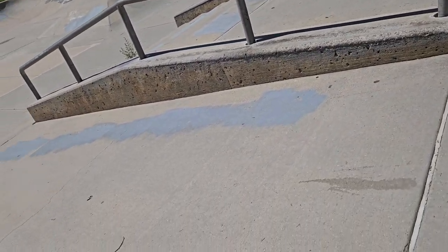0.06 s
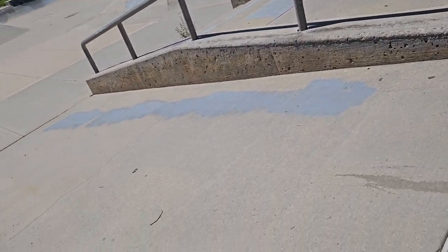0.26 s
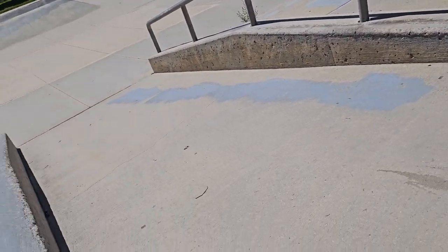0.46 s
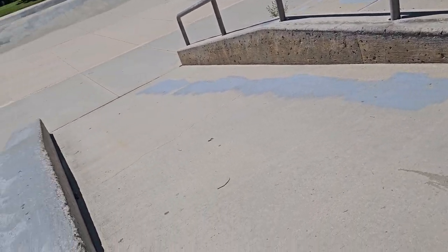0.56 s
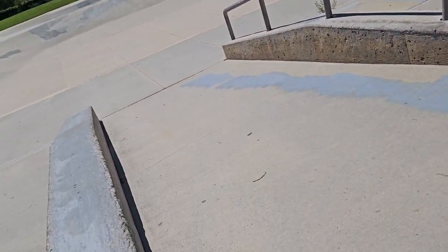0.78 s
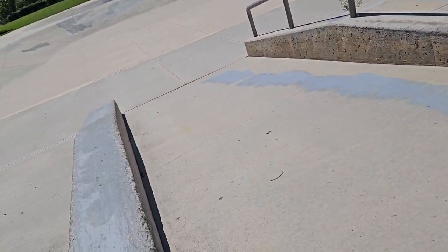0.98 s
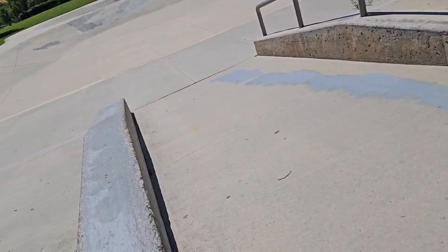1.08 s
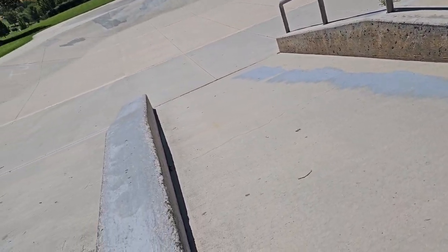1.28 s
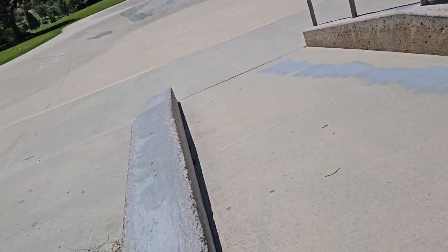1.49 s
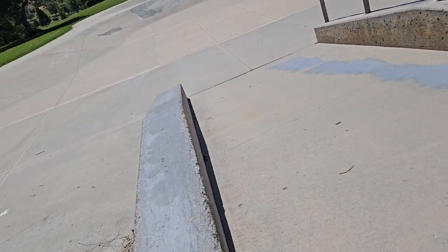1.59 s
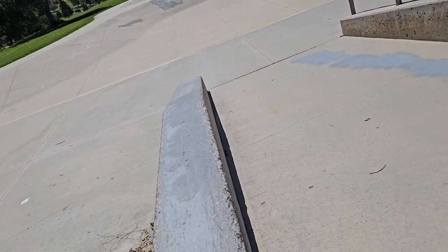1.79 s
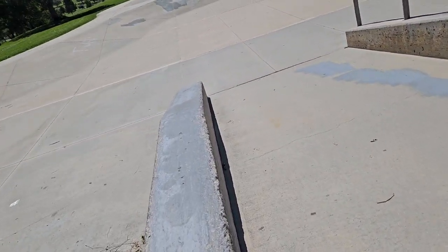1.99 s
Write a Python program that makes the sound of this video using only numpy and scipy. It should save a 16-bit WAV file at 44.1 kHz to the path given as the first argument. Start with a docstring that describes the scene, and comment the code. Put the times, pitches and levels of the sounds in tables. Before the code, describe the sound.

A skateboard is heard close on outdoor concrete, starting with a brief fading scrape. From 0.25 to 0.9 seconds it clacks down and knocks over joints, the wooden deck booming, axles rattling and wheels rumbling grittily. After a lull with faint taps, two more knocks come near 1.6 seconds, then small taps and a dull scuff at 1.9. Light wind on the microphone and a low hum continue throughout.

```python
"""A skateboard on the concrete of an open skatepark, heard up close.
Light wind rumbles on the microphone throughout, over a low hum. A scrape dies away at the start, and
grit makes the rolling wheels rumble and hiss. From 0.25 s the board clacks down and knocks over joints
in the slab: its wooden deck booms, and its trucks (the metal axles) rattle and ring. After a lull,
two more knocks come near 1.6 s, and the board settles with small taps and a dull scuff."""
import sys
import numpy as np
from scipy import signal
from scipy.fft import rfft, irfft
from scipy.io import wavfile

SR = 44100
rng = np.random.default_rng(int(sys.argv[2]) if len(sys.argv) > 2 else 0)


def generate_wav(sig):
    """Save sig (samples, or channels by samples) to the path in sys.argv[1] as 16-bit PCM at SR."""
    pcm = np.round(np.clip(np.atleast_2d(sig).T, -1, 1) * 32767).astype(np.int16)
    wavfile.write(sys.argv[1], SR, pcm)


N = 90404
TIME = np.arange(N) / SR
HIT_TIME = np.arange(SR // 3) / SR  # the clock for one short sound

# Strength of the wind: time_s, level_db
WIND_GUSTS = [(0, -41), (.14, -34.5), (.3, -48.5), (1.2, -46.5), (1.3, -40.5), (1.5, -45.5), (2.05, -44.5)]
# Tone of the wind, the open air, the opening scrape and the wheel hiss: pitch_hz, gain_db
WIND_TONE = [(25, -4.5), (52, 2), (100, -1), (145, -4), (190, -14), (330, -24.5), (1000, -70)]
AIR_TONE = [(700, -4), (1200, -13), (4800, -19), (7500, -23), (9500, -39)]
SCRAPE_TONE = [(200, -5), (340, 15), (600, 9.5), (700, -10.5), (1060, 9), (1550, -14), (1850, 12),
               (2500, -0.5), (4600, -9), (7000, -8), (9800, -39.5), (12800, -25.5)]
HISS_TONE = [(600, -20.5), (1800, 8), (2500, -4), (6300, -2), (8600, -9), (9900, -17.5), (12000, -13),
             (15500, -9)]
# Loudness of the rolling wheels: time_s, rumble_db, hiss_db
WHEEL_LEVELS = [(0, -30, -75), (.12, -46, -59), (.22, -36.5, -48), (.31, -27, -45), (.37, -37, -56),
                (.44, -23, -41), (.5, -33.5, -53), (.63, -43.5, -63), (.72, -39.5, -58.5),
                (.78, -41, -67.5), (.85, -43.5, -54.5), (1.01, -65, -76), (1.09, -43.5, -71),
                (1.17, -52, -74), (1.22, -73.5, -90.5), (1.59, -57, -70), (1.63, -41.5, -58),
                (1.72, -38.5, -62), (1.77, -84, -92.5), (2.05, -71, -71)]
# Pitches at which the whole board and the trucks ring when shaken: pitch_hz, width_hz, gain_db
BOARD_RESONANCES = [(295.8, 129, 0), (521.5, 59, 5), (598, 110, -7.5), (760, 61, -0.5), (1106, 120, -10),
                    (1258, 300, -7.5), (1586, 110, -12.5), (2150, 300, -21.5)]
TRUCK_RESONANCES = [(2150, 160, 0), (3580, 80, 10), (4050, 70, 2)]
# Hard knocks (a fade is the time a sound takes to drop by 60 dB):
# start_s, boom_db, boom_hz, boom_fade_s, clack_db, clack_hz, clatter_db, crack_db, clatter_fade_s
HARD_KNOCKS = [(0.2457, 7, 299, 0.017, -14, 527, -17, -16, 0.041),
               (0.2872, 2.5, 310, 0.036, -21, 531, -13.5, -27.5, 0.11),
               (0.3833, -10, 322.4, 0.35, -11, 568, -8.5, -27.5, 0.061),
               (0.398, -5.5, 289, 0.15, -2.5, 651, -13.5, -30.5, 0.12),
               (0.6583, -3.5, 289.5, 0.081, -2.5, 670, -23.5, -36.5, 0.21),
               (0.8046, -7, 302, 0.085, -7, 683, -22.5, -38.5, 0.23),
               (.8820, 0, 278, 0.02, -5, 673, -16, -36, 0.065),
               (1.5382, -11, 287.5, 0.048, -2, 626.6, -15.5, -31.5, 0.064),
               (1.6030, -9.5, 304.3, 0.066, -12.5, 656, -22, -35.5, 0.083)]
# Small taps and rattles: start_s, boom_db, clack_db, clack_hz, clatter_db, crack_db, fade_s
SMALL_TAPS = [(0.2515, -43, -8.5, 1112, -14.5, -54, 0.01), (.2950, -31.5, -7.5, 1000, -52, -46, 0.025),
              (0.2999, -39, -14.5, 1102, -29, -53, .04), (.436, -47, -31, 996, -22, -53, 0.12),
              (.4610, -42, -24, 539, -31, -48, 0.2), (.487, -31.5, -22, 594, -37.5, -53, 0.12),
              (.702, -22, -20, 674, -35.5, -51, 0.05), (.733, -29.5, -25, 548, -32, -54, 0.051),
              (0.8921, -8.5, -19.5, 745, -33, -38, 0.025), (1.042, -47.5, -30.5, 600, -48, -52, 0.041),
              (1.050, -39.5, -21.5, 622, -38, -50.5, 0.13), (1.112, -70, -28, 714, -42, -51.5, 0.06),
              (1.182, -59, -42, 708, -52, -58.5, 0.057), (1.559, -41, -23.5, 690, -29, -39.5, 0.036),
              (1.653, -28, -19.5, 570, -32.5, -52, 0.21), (1.715, -36, -28, 660, -41, -49.5, 0.016),
              (1.887, -36.5, -37.5, 532, -40, -61, 0.037)]
# Higher notes of the deck, with levels relative to its boom: pitch_hz, level_db, longest_fade_s
DECK_OVERTONES = [(506, -15.5, 0.21), (624.5, -21.5, 0.3), (752, -14, 0.22), (903, -26.5, 0.3),
                  (1070.5, -25, 0.065), (1300.3, -19.5, 0.076), (1631, -42.5, 0.24)]
# Tone of the sharp crack in each hit: pitch_hz, gain_db
CRACK_TONE = [(500, -21), (1500, 10), (2100, 6), (4800, -7.5), (6300, -7), (8400, -13.5), (9800, -22),
              (12000, -12.5), (15000, -10.5), (16500, -18)]
# How late the hits reach the left channel as the board moves: time_s, delay_ms
LEFT_DELAYS = [(.35, 0.2524), (.9, .1)]
# Fine ticks of grit and hardware: start_s, level_db
GRIT_TICKS = [(0.2592, -24), (0.635, -51.5)]
# Tone of those ticks: pitch_hz, gain_db
TICK_TONE = [(4800, -9.5), (6300, 11), (8000, -4), (9800, -13.5), (13000, -10.5)]
# Thin metal rings of a truck: start_s, level_db
TRUCK_PINGS = [(.291, -28), (.3838, -31), (.433, -42), (1.5385, -36)]
# Tone of the dull scuff: pitch_hz, gain_db
SCUFF_TONE = [(120, 2), (600, 3.5), (950, -8.5), (2200, -11.5), (5500, -31.5), (10000, -48)]
# How alike left and right are: pitch_hz, likeness_0_to_1
STEREO_LIKENESS = [(30, .8), (80, .93), (200, .998), (1000, .99), (2800, .85), (14000, .55)]
# Balance of the microphone's two sides: pitch_hz, right_minus_left_db
MIC_BALANCE = [(250, -0.25), (620, -3), (1200, -1), (5000, -1), (13000, 4.5)]


def amp(db):
    """Turns decibels into a number to multiply by."""
    return 10 ** (np.asarray(db) / 20)


def unit(x):
    """Scales a sound to an average (rms) strength of one."""
    return x / np.sqrt(np.mean(x ** 2) + 1e-20)


def at_pitch(table, hz):
    """Looks up a table by pitch, giving every octave equal room."""
    pitches, values = np.transpose(table)
    return np.interp(np.log(hz + 1), np.log(pitches), values)


def level(table, column=1):
    """Turns one decibel column of a table into a smooth gain over time."""
    rows = np.array(table)
    return amp(np.interp(TIME, rows[:, 0], rows[:, column]))


def add(mix, start_s, sound):
    """Mixes a sound in at its start time."""
    part = mix[:, max(round(start_s * SR), 0):][:, :sound.shape[1]]
    part += sound[:, :part.shape[1]]


def colour(x, tone):
    """Gives a sound the tone in a table; white noise keeps its overall strength."""
    size = 8192
    log_gain = np.log(amp(at_pitch(tone, abs(np.fft.fftfreq(size, 1 / SR)))))
    response = np.exp(np.conj(signal.hilbert(log_gain)))  # rings after a hit, never before it
    taps = np.fft.ifft(response).real[:size // 2]
    return signal.fftconvolve(x, taps[None] / np.linalg.norm(taps), axes=1)[:, :x.shape[1]]


def noise(count):
    """Stereo white noise whose two sides are least alike in the treble."""
    a, b = rfft(rng.standard_normal((2, count)))
    likeness = at_pitch(STEREO_LIKENESS, np.fft.rfftfreq(count, 1 / SR))
    shared = a * np.sqrt((1 + likeness) / 2)
    side = b * np.sqrt((1 - likeness) / 2)
    return irfft(np.array([shared + side, shared - side]), count)


def delay_left(x, delay_ms):
    """The board's sound reaches the left channel a little later than the right."""
    count = x.shape[1]
    shift = np.exp(-2j * np.pi * np.fft.rfftfreq(count, 1 / SR) * delay_ms / 1000)
    return np.array([irfft(rfft(x[0]) * shift, count), x[1]])


def outdoors(hum_hz=71.33, hum_width_hz=3.1, hum_db=-45.5, air_db=-67.5):
    """Wind rumbles on the microphone, with a wavering low hum and faint open-air hiss."""
    hum_band = np.exp(-((np.fft.rfftfreq(N, 1 / SR) - hum_hz) / hum_width_hz) ** 2)
    hum = amp(hum_db) * unit(irfft(rfft(noise(N)) * hum_band, N))
    wind = level(WIND_GUSTS) * unit(colour(noise(N), WIND_TONE))
    air = amp(air_db) * colour(noise(N), AIR_TONE)
    return hum + wind + air


def grit(grains_per_s=600, spread_db=3.5, grain_share=.55):
    """Concrete under a wheel: fine roughness and scattered larger grains."""
    struck = rng.random(N) < grains_per_s / SR
    sizes = amp(spread_db * np.minimum(rng.exponential(1, N), 4))
    grains = struck * sizes * rng.choice([-1, 1], N)
    return np.sqrt(1 - grain_share) * noise(N) + np.sqrt(grain_share) * unit(grains)


def shake_board(x):
    """A shaken board sounds loudest near its own natural pitches."""
    hz = np.geomspace(30, SR / 2, 2000)
    power = sum(amp(db) ** 2 * (1 + (2 * (hz - centre) / width) ** 2) ** -1.5
                for centre, width, db in BOARD_RESONANCES)
    return colour(x, np.c_[hz, 10 * np.log10(power)])


def shake_trucks(x):
    """The metal trucks add a rough ring to whatever shakes them."""
    return x + sum(amp(db) * signal.lfilter(*signal.iirpeak(hz, hz / width, SR), x)
                   for hz, width, db in TRUCK_RESONANCES)


def wheels(scrape_db=-27, scrape_fall_db_per_s=108.5):
    """Grit shakes the deck and hisses at the wheels; a bright scrape dies away at the start."""
    rumble = shake_board(grit() * level(WHEEL_LEVELS))
    hiss = shake_trucks(colour(grit() * level(WHEEL_LEVELS, column=2), HISS_TONE))
    scrape = colour(grit() * amp(scrape_db - scrape_fall_db_per_s * TIME), SCRAPE_TONE)
    return delay_left(rumble + hiss + scrape, delay_ms=0.25)


def deck_boom(pitch_hz, fade_s, rise_s=0.0019):
    """The struck deck rings with one low note and higher ones that vary a little from hit to hit."""
    t = HIT_TIME
    boom = amp(-60 * t / fade_s) * np.cos(2 * np.pi * pitch_hz * t)
    for hz, db, longest_fade_s in DECK_OVERTONES:
        detune = 1 + rng.uniform(-.015, .015)
        fade = amp(db - 60 * t / min(longest_fade_s, 2 * fade_s))
        boom += fade * np.sin(2 * np.pi * hz * detune * t)
    return (1 - np.exp(-t / rise_s)) * boom


def truck_clack(pitch_hz, peak_s=0.0029, steepness=3.6, thud_hz=171.4, thud_fade_s=0.076):
    """The struck truck vibrates for just a few cycles, over a softer low thud."""
    t = HIT_TIME
    age = t / peak_s
    pulse = np.sqrt(age) * np.exp((1 - age ** steepness) / (2 * steepness))
    phase = 2 * np.pi * pitch_hz * t
    note = np.sin(phase) + amp(-23.5) * np.sin(2 * phase)
    thud = amp(-16.5 - 60 * t / thud_fade_s) * np.sin(2 * np.pi * thud_hz * t)
    return pulse * note + thud


def sharp_crack(fade, rise_s=.0003, snap_s=0.0011, rattle_db=1.5, rattle_step_s=0.0025):
    """A bright snap of noise with a rattling tail sets the trucks ringing."""
    t = HIT_TIME
    flicker = np.interp(t / rattle_step_s, np.arange(len(t)), rng.standard_normal(len(t)))
    shape = (1 - np.exp(-t / rise_s)) * (1.135 * fade + 0.65 * np.exp(-t / snap_s))
    burst = noise(len(t)) * amp(rattle_db * flicker) * shape
    return shake_trucks(colour(burst, CRACK_TONE))


def hit(boom_db, boom_hz, boom_fade_s, clack_db, clack_hz, clatter_db, crack_db, clatter_fade_s):
    """Wheels strike concrete with a crack: the deck booms, a truck clacks, loose hardware clatters."""
    boom = amp(boom_db) * deck_boom(boom_hz, boom_fade_s)
    clack = amp(clack_db) * truck_clack(clack_hz)
    fade = amp(-60 * HIT_TIME / clatter_fade_s)
    clatter = amp(clatter_db) * shake_board(noise(len(fade)) * fade)
    crack = amp(crack_db) * sharp_crack(fade)
    return boom + clack + clatter + crack


def knocks(choke_s=0.00067, tap_boom_hz=324, bass_cut_hz=94.1):
    """The board knocks and taps; each hard knock stops the ringing of the one before."""
    out = np.zeros((2, N))
    delay_curve = np.transpose(LEFT_DELAYS)
    for start_s, *settings in HARD_KNOCKS:
        out *= np.exp(-np.maximum(TIME - start_s + choke_s, 0) / choke_s)
        add(out, start_s, delay_left(hit(*settings), np.interp(start_s, *delay_curve)))
    for start_s, boom_db, clack_db, clack_hz, clatter_db, crack_db, fade_s in SMALL_TAPS:
        tap = hit(boom_db, tap_boom_hz, fade_s, clack_db, clack_hz, clatter_db, crack_db, fade_s)
        add(out, start_s, delay_left(tap, np.interp(start_s, *delay_curve)))
    return signal.sosfilt(signal.butter(2, bass_cut_hz, "high", fs=SR, output="sos"), out)


def ticks(decay_s=0.0012):
    """Grit and hardware make short, bright clicks."""
    out = np.zeros((2, N))
    for start_s, db in GRIT_TICKS:
        add(out, start_s, amp(db) * np.exp(-HIT_TIME / decay_s) * noise(len(HIT_TIME)))
    return colour(out, TICK_TONE)


def pings(pitch_hz=3610, rise_s=.0003, fade_s=.055):
    """A metal truck rings out with one thin, high note."""
    out, t = np.zeros((2, N)), HIT_TIME
    note = (1 - np.exp(-t / rise_s)) * np.sin(2 * np.pi * pitch_hz * t)
    for start_s, db in TRUCK_PINGS:
        add(out, start_s, amp(db - 60 * t / fade_s) * note[None])
    return out


def scuff(start_s=1.869, rub_db=-35.5, fade_s=0.1, click_s=0.0012):
    """A click and a brief, dull rub on the concrete."""
    out, t = np.zeros((2, N)), HIT_TIME
    rub = noise(len(t)) * amp(rub_db - 60 * t / fade_s)
    click_boost = 1 + 2 * np.exp(-t / click_s)
    add(out, start_s, colour(rub * click_boost, SCUFF_TONE))
    return out


def park_echoes(x, level_db=-20.5, fade_s=0.27, first_s=.012, echoes_per_s=2000):
    """Ledges and ramps throw back weak, scattered echoes."""
    t = HIT_TIME
    strengths = rng.standard_normal((2, len(t))) * amp(-60 * t / fade_s)
    arrivals = (rng.random((2, len(t))) < echoes_per_s / SR) * (t > first_s)
    echoes = strengths * arrivals
    echoes /= np.linalg.norm(echoes[0])
    return x + amp(level_db) * signal.fftconvolve(x, echoes, axes=1)[:, :N]


def scene():
    """The skateboard and its echoes in the open air."""
    skateboard = knocks() + pings() + wheels() + ticks() + scuff()
    return park_echoes(skateboard) + outdoors()


def record(dry):
    """The microphone is brighter on the right, rounds off loud peaks and cuts the highest treble."""
    balance_db = at_pitch(MIC_BALANCE, np.fft.rfftfreq(N, 1 / SR))
    balanced = irfft(rfft(dry) * amp(np.outer([-.5, .5], balance_db)), N)
    rounded = balanced / (1 + balanced ** 8) ** (1 / 8)
    treble_cut = signal.firwin(255, cutoff=15900, window=("kaiser", 8), fs=SR)
    return signal.oaconvolve(rounded, treble_cut[None], "same")


dry = scene()
out = record(dry)
generate_wav(out)
```